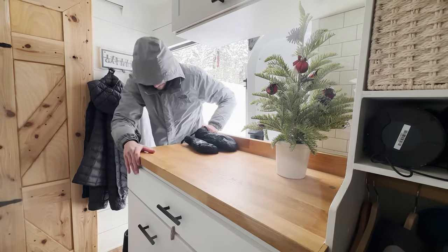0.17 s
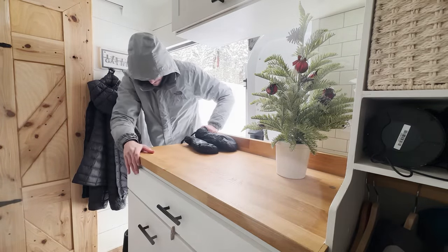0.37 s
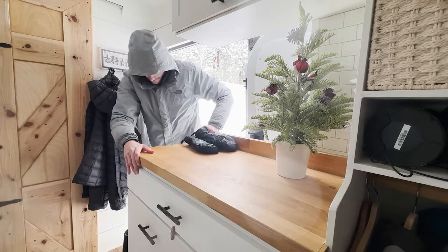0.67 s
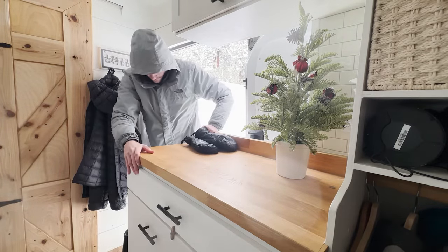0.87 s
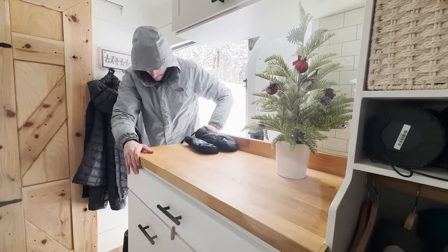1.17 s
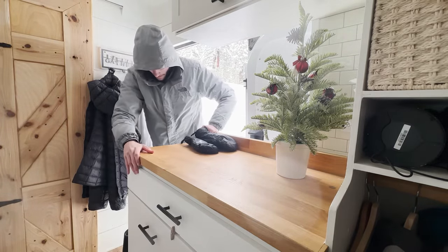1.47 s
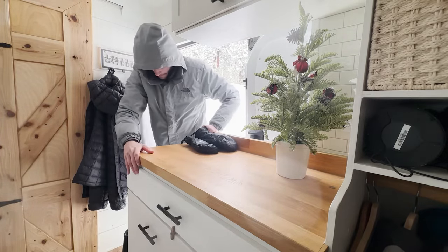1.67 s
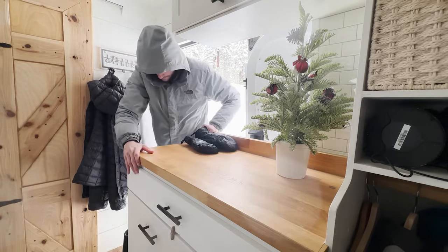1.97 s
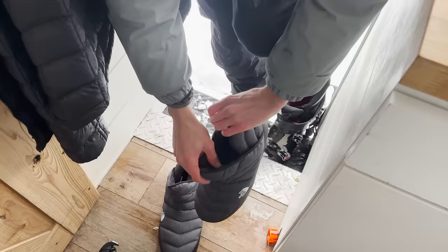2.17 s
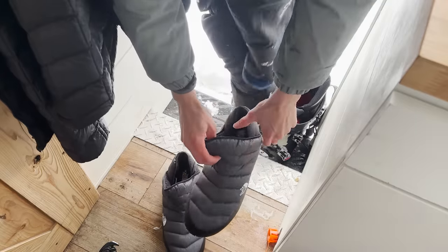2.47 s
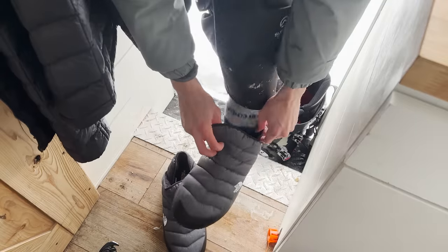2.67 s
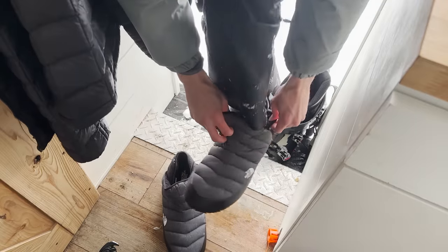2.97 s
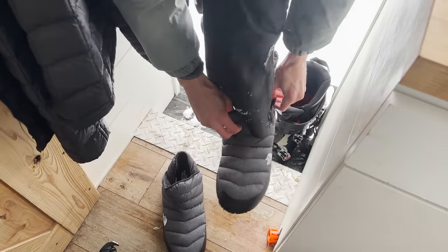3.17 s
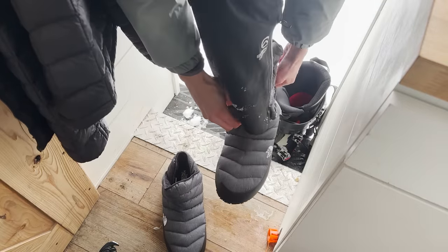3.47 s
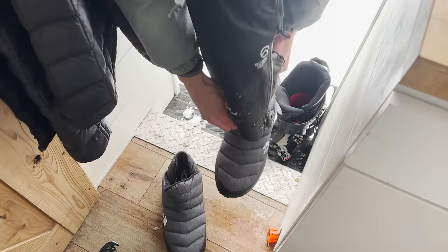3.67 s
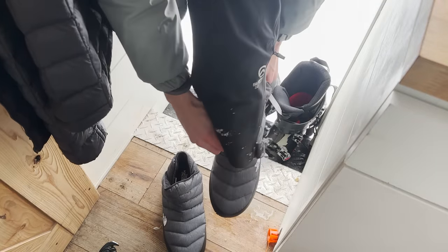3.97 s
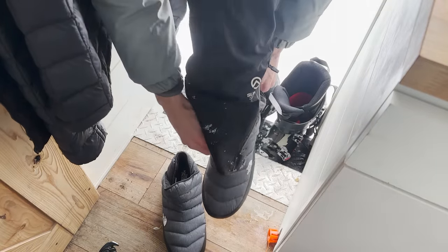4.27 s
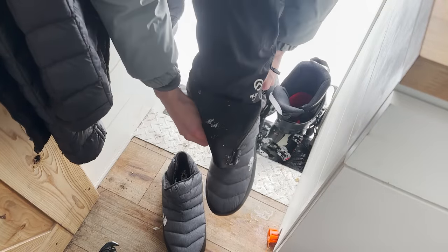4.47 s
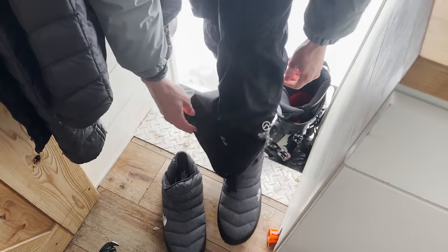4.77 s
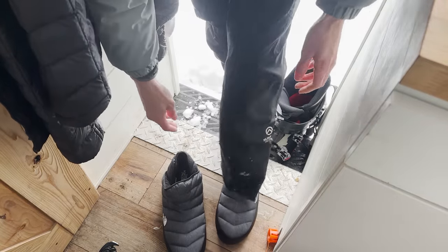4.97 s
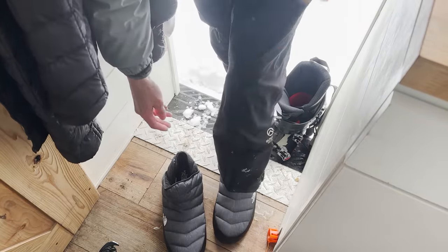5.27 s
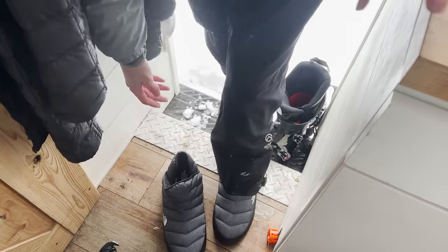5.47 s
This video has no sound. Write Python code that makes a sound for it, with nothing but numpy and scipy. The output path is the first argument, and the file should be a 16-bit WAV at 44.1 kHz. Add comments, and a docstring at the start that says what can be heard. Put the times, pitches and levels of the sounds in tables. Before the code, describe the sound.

Four hard, hollow boot blows ring through floorboards in a tight cabin, followed by close, quiet fabric rustling, small ticks and a faint final foot contact.

```python
"""Stiff boots are kicked off on the step of a small wood-lined van, then a padded slipper is pulled on.
Close up inside, each blow rings decaying board modes and two boot-shell modes under a noise cabin echo.
Nylon clothes rustle as flickering noise bands; buckles and grit tick as short noise bursts.
Low noise rocks the van on its springs and rumbles its panels; faint steady noise is the still air
at the open door. The microphone signal is softly rounded at its peaks and has its top cut."""
import sys
import numpy as np
from scipy import signal
from scipy.io import wavfile
from scipy.ndimage import uniform_filter1d

SR = 44100
rng = np.random.default_rng(int(sys.argv[2]) if len(sys.argv) > 2 else 0)


def output_pcm(signal):
    """Save a mono or channel-first signal as 16-bit PCM at the path in sys.argv[1].

    Samples are clipped to [-1, 1] before scaling.
    """
    pcm = np.clip(np.atleast_2d(signal).T, -1, 1) * 32767
    wavfile.write(sys.argv[1], SR, np.round(pcm).astype(np.int16))


N = 247401


def undb(db):
    """Turn decibels into an amplitude factor."""
    return 10 ** (np.asarray(db) / 20)


def on_log(hz, points_hz, values):
    """Read a spectrum on a log-frequency axis."""
    return np.interp(np.log(hz), np.log(points_hz), values)


def band(hz, octaves, size):
    """Noise of rms 1 around a centre frequency."""
    edges = np.clip([hz * 2 ** (-octaves / 2), hz * 2 ** (octaves / 2)], 1, SR / 2.1)
    bandpass = signal.butter(2, edges, "band", fs=SR, output="sos")
    run_in = SR // 4  # dropped, so that the filter has settled
    x = signal.sosfilt(bandpass, rng.standard_normal(size + run_in))[run_in:]
    return x / x.std()


def walk(rate):
    """Random levels held 1 / rate s and smoothed twice; spread near 1."""
    k = int(SR / rate)
    held = np.repeat(rng.standard_normal(N // k + 1), k)
    slewed = uniform_filter1d(uniform_filter1d(held, k), k)
    return 1.3 * slewed[:N]


def fade(t, t60, rise_s):
    """Rise, then die by 60 dB in t60."""
    return (1 - np.exp(-t / rise_s)) * np.exp(-np.log(1000) * t / t60)


def add(out, s, x):
    """Mix a sound in at a time."""
    i = int(s * SR)
    out[i:i + len(x)] += x[:N - i]


def curve(table):
    """A control at every sample, in straight lines between the points."""
    return np.interp(np.arange(N) / SR, *np.transpose(table))


STEP_DB = 20  # a listed rise or fall time covers this much


def swells_db(rows, peak_db):
    """Summed power, in dB, of swells that rise, hold and fall at steady dB rates."""
    t = np.arange(0, N, 64) / SR
    power = 1e-12
    for (s, rise_s, hold_s, fall_s), db in zip(rows, peak_db):
        # 0 during the hold, 1 at one rise time before it or one fall time after it
        away = np.maximum((s - t) / rise_s, (t - s - hold_s) / fall_s)
        power = power + undb(db - STEP_DB * np.clip(away, 0, None)) ** 2
    return curve(np.transpose([t, 10 * np.log10(power)]))


# still air at the open door: f/Hz, level/dB of each half-octave band
STILL_AIR = [(70, -86), (130, -85.5), (300, -82), (1000, -83.5), (3000, -80.5), (8000, -80.5),
             (15000, -89.5)]
# cabin air resonances: f/Hz, width/octaves, level/dB
HOLLOWS = [(50, .25, -79), (202, 0.2, -78), (358, 0.2, -80), (1072, 0.57, -78)]


def air():
    """A faint even noise hush, with wavering noise bands where the cabin air resonates."""
    out = np.zeros(N)
    for hz in 60 * 2 ** np.arange(0, 8.1, .5):
        out += undb(on_log(hz, *np.transpose(STILL_AIR))) * band(hz, 0.63, N)
    for hz, octaves, db in HOLLOWS:
        waver_db = 1.3 * walk(4.3)
        out += undb(db + waver_db) * band(hz, octaves, N)
    return out


# colour of the nylon rustle: f/Hz, level/dB per Hz, relative to the moves
RUSTLE = [(59, -43), (100, -12.5), (206, -4.5), (308, -6.5), (365, 8), (461, -6.5), (970, -5),
          (2470, -11.5), (8280, -14), (12700, -26.5), (16000, -24)]
# moves of sleeves, trousers and slipper: full level from t/s, rise/s, hold/s, fall/s,
# rustle level/dB, swish level/dB against the rustle, shuffle level/dB
MOVES = [(0.0, .02, 0.021, 0.17, -64, -4, -71), (0.192, 0.16, .05, .06, -54, -5.5, -54.5),
         (0.287, .04, 0.041, 0.18, -62.5, -6.5, -63), (0.439, 0.044, 0.08, 0.14, -64.5, -2.5, -69),
         (0.628, 0.048, .05, .4, -61.5, -6, -64), (0.836, 0.11, .02, .03, -66.5, -11, -64.5),
         (1.13, .1, .04, 0.058, -68.5, -15, -69), (1.231, 0.057, .04, 0.41, -73, 3, -71),
         (1.365, 0.13, .04, 0.048, -66, -4, -67.5), (1.588, 0.12, 0.053, 0.13, -62, -9, -57),
         (1.72, 0.11, 0.02, .11, -70.5, -11, -70), (1.933, 0.017, 0.015, 0.24, -62.5, -6, -66),
         (2.26, .1, 0.058, 0.28, -62, 8.5, -57.5), (2.405, 0.14, .03, 1, -56.5, -2.5, -57.5),
         (2.507, 0.13, 0.027, .3, -60.5, 6, -72.5), (2.66, 0.1, 0.051, 0.21, -63, -1, -70),
         (3, 0.2, 0.04, 0.19, -64.5, 2.5, -70), (3.14, 0.17, 0.042, 0.17, -63, -1, -66),
         (3.329, .15, 0.092, 0.099, -69, 3.5, -68), (3.525, 0.055, 0.13, 0.27, -68.5, 2, -67),
         (3.746, 0.54, 0.023, 0.19, -60.5, -5, -65.5), (3.954, 0.29, 0.13, 0.22, -62.5, -5, -69),
         (4.111, 0.19, 0.04, 0.073, -55, -5.5, -55), (4.293, 0.051, .06, .1, -71, -4.5, -74.5),
         (4.551, 0.094, 0.015, 0.19, -56.5, -4, -58.5), (4.653, 0.18, 0.077, 0.29, -62, 4, -67.5),
         (4.823, .04, 0.016, 0.048, -66.5, -2, -65), (4.92, 0.099, 0.021, 0.12, -62.5, -3, -62),
         (5, .04, .02, 0.11, -64, 1.5, -72), (5.11, 0.25, .02, 0.22, -65, 2.5, -58.5),
         (5.202, 0.16, 0.067, 0.14, -68, 2.5, -65), (5.34, 0.16, .02, 0.22, -65, -1.5, -60.5),
         (5.478, 0.34, 0.094, .1, -63.5, -2, -55.5), (5.572, .03, .04, .1, -60.5, -7, -46.5)]


def cloth():
    """Nylon on nylon: noise bands that flicker, treble opening on quick slides, bass from shuffling feet."""
    *shape, level, swish, shuffle = np.transpose(MOVES)
    rows = np.transpose(shape)
    level_db = swells_db(rows, level)
    swish_db = swells_db(rows, level + swish)
    shuffle_db = swells_db(rows, shuffle)
    rustle_hz, rustle_db = np.transpose(RUSTLE)
    # folds let go in small jerks shared by all bands, and now and then in a sharp crackle
    snaps = (rng.random(N) < 30 / SR) * rng.exponential(0.45, N)  # about 30 per second
    crackle = signal.lfilter([1], [1, -np.exp(-1 / (0.002 * SR))], snaps)  # each dies over 2 ms
    jerks = undb(1.0 * walk(25) + 0.88 * walk(90)) * (1 + 0.35 * crackle)
    out = np.zeros(N)
    for hz in 110 * 2 ** np.arange(0, 7.6, .5):
        # bass follows the shuffle, treble the swish, the middle the rustle
        swish_share = on_log(hz, (1800, 4000), (0, 1))
        shuffle_share = on_log(hz, (400, 800), (1, 0))
        level_share = 1 - shuffle_share - swish_share
        moving_db = shuffle_share * shuffle_db + swish_share * swish_db + level_share * level_db
        width_db = 10 * np.log10(hz / 1000)  # bands widen with frequency
        flicker_db = 1.6 * walk(14)
        db = on_log(hz, rustle_hz, rustle_db) + width_db + moving_db + flicker_db
        out += undb(db) * band(hz, 0.65, N)
    return jerks * out


# rocking on the springs: t/s, level/dB
SWAY = [(0.0, -60), (0.22, -42), (0.48, -59), (0.58, -49.5), (0.67, -60), (0.73, -51), (0.82, -52),
        (1.0, -61), (1.05, -47), (1.34, -64.5), (1.86, -58.5), (2.14, -61), (2.36, -41.5), (2.62, -35),
        (2.76, -47), (2.94, -55), (4.2, -56.5), (4.9, -67), (5.2, -45), (5.41, -59), (5.56, -41.5),
        (5.61, -44)]
# loads that set the panels rumbling: full level from t/s, rise/s, hold/s, fall/s, level/dB
LOADS = [(0.142, 0.053, .01, 0.09, -42.5), (0.3, .1, 0.11, 0.27, -63), (0.677, 0.054, 0.18, 0.16, -42.5),
         (1.045, 0.1, .02, 0.48, -45.5), (1.547, 0.06, .01, 0.13, -46), (1.761, 0.083, .05, 0.8, -64),
         (2.215, 0.13, 0.033, 0.092, -43), (2.4, .1, .02, .1, -54), (2.6, 0.089, 0.018, 0.082, -71),
         (4.91, 0.084, .01, .1, -68.5), (5.11, .1, 0.013, 0.085, -55.5), (5.408, .1, .2, .1, -73)]


def body():
    """The van rocks on its springs below hearing and its panels rumble low with each load."""
    loads = np.array(LOADS)
    rocking = undb(curve(SWAY)) * band(5.8, 1.65, N)
    rumble = undb(swells_db(loads[:, :-1], loads[:, -1])) * band(42, 1.3, N)
    return rocking + rumble


# boot blows: t/s; six colour levels/dB (thud, boom, boards, knock, crack, grit); contact/s; # decay
# stretch/ratio; thud lag/s; boot shell low f/Hz, level/dB, high f/Hz, level/dB; # time/s after which the boards
# and boot shell die away fast
BLOWS = [(0.125, -48, -40, -43.5, -44.5, -44, -52, 0.022, 0.89, 0.0058, 512, -36.5, 1030, -38, .2),
         (0.655, -17.5, -18.5, -23, -18, -21.5, -36.5, 0.0079, 0.94, 0.012, 711, -17, 1241, -13, 0.15),
         (1.01, -20.5, -15.5, -20, -27.5, -31, -36.5, .013, 0.9, 0.0015, 311.8, -15, 692, -31, .13),
         (1.519, -52, -42.5, -27, -32, -43.5, -58.5, 0.0081, 0.85, 0.00033, 461, -27.5, 704, -23.5, 0.056),
         (2.142, -17.5, -12, -18, -18, -23.5, -28, 0.0078, 0.87, 0.0042, 292.3, -16.5, 934, -14, 0.068),
         (5.064, -48.5, -49.5, -50, -60, -51, -70, 0.031, 0.38, 0.00067, 354, -56.5, 1201, -50, 0.034),
         (5.578, -68.5, -43, -48, -45, -52, -64.5, 0.015, 0.36, 0.0054, 535, -38.5, 960, -54, .05)]
# centres of the six colour levels, in the same order: f/Hz
BLOW_BANDS_HZ = (120, 200, 330, 950, 3000, 9500)
# modes of floor, step and cupboards: f/Hz, level/dB against the blow's colour, t60/s before the stretch
BOARDS = [(62, -13.5, 0.09), (94, -4, .25), (126.5, 3.5, 0.24), (167.9, -1.5, 0.18), (192.1, -3.5, 0.24),
          (239.4, 1, .26), (276.4, -1.5, 0.31), (300.7, 2, 0.17), (334.8, -8, 0.39), (396.3, 3, 0.18),
          (436.3, -5, .13), (464.3, -3, 0.18), (505, -4, 0.24), (593, -1, 0.14), (674, -11, .13),
          (716, -4.5, 0.2), (861, -6, 0.089), (895, 3, 0.078), (1073, -1.5, 0.073), (1125, -14.5, .09),
          (1115, 0, 0.12), (1282, -6.5, .07), (1383, -9.5, 0.079), (1649, -5, 0.11), (1640, -20, .14),
          (2195, -10.5, 0.054), (2670, -7.5, .12)]
# cabin echo: f/Hz, level/dB against the blow's colour, t60/s before the stretch
CABIN = [(400, -8, 0.22), (990, -5, 0.16), (2530, -4.5, 0.17), (6000, -3.5, 0.16), (11430, -2.5, 0.14),
         (16300, -24.5, 0.12)]
BOARDS_DB, CABIN_DB = -5, -1.5  # added to every board level and every cabin level
SETTLE_SHARE = 0.17  # part of the contact that sets how slowly the force builds up


def blows():
    """Each blow drives the same board modes while the sole is in contact; the cabin returns a dense tail."""
    out, t = np.zeros(N), np.arange(SR // 2) / SR
    cabin_hz, cabin_db, cabin_t60 = np.transpose(CABIN)
    for s, *colour_db, contact_s, stretch, lag_s, low_hz, low_db, high_hz, high_db, damped_s in BLOWS:
        held = np.clip(t - contact_s, 0, None)  # the ring only dies once the sole has settled
        choke = undb(-250 * np.clip(t - damped_s, 0, None))  # after that time boards and shell die a further 250 dB/s
        force_s = SETTLE_SHARE * contact_s
        for hz, db, t60 in BOARDS:
            detune, phase, place = rng.standard_normal(3)
            rise = 1 - np.exp(-t / (force_s + 0.57 / hz))  # low boards take longer to swing up
            place_db = 1.2 * place  # every blow lands elsewhere
            gain = undb(on_log(hz, BLOW_BANDS_HZ, colour_db) + db + BOARDS_DB + place_db)
            ring = np.sin(2 * np.pi * (hz * (1 + 0.0075 * detune) * t + phase))
            decay = fade(held + 0.0004, t60 * stretch, 1e-4)
            # the weight arrives after the first touch, and only the big boards feel it
            late_s = lag_s * on_log(hz, (150, 500), (1, 0))
            add(out, s + late_s, gain * rise * decay * choke * ring)
        # loose buckles and drawers make the tail a little lumpy
        rattle = undb(.9 * walk(250)[:len(t)])
        for hz in 400 * 2 ** np.arange(0, 5.6, .5):
            echo_db = on_log(hz, cabin_hz, cabin_db) + CABIN_DB
            gain = undb(on_log(hz, BLOW_BANDS_HZ, colour_db) + echo_db)
            rise = 1 - np.exp(-t / (force_s + 0.27 / hz))
            tail = fade(held + 0.00075, on_log(hz, cabin_hz, cabin_t60) * stretch, 1e-4)
            add(out, s, gain * rise * tail * rattle * band(hz, 0.6, len(t)))
        # the hollow boot itself: two quickly damped modes that depend on which boot and face is struck
        for hz, db in ((low_hz, low_db), (high_hz, high_db)):
            shell = np.sin(2 * np.pi * hz * t)
            add(out, s, undb(db) * fade(t, 30 / hz + 0.068, 0.0039) * choke * shell)
    return out


# ticks of buckles, grit and seams: t/s, nominal peak level/dB, centre f/Hz, t60/s, width/octaves
TICKS = [(.280, -43.5, 1790, 0.064, 1.2), (0.438, -41.5, 1250, 0.085, 1.2), (0.631, -51, 1200, 0.11, 0.81),
         (0.847, -58.5, 2350, 0.13, 1.3), (1.227, -50, 1590, 0.33, 1.3), (1.345, -63, 1190, 0.14, 0.54),
         (1.701, -54, 3510, .06, 1.3), (1.745, -54, 2080, 0.29, 0.51), (1.883, -50.5, 2200, 0.064, 2.5),
         (1.935, -40, 4930, 0.11, 2.1), (2.0, -53, 1490, 0.092, 1.8), (2.067, -50, 1500, 0.15, 1.7),
         (2.271, -42.5, 3470, 0.75, 0.83), (2.395, -35, 894, .04, 0.88), (2.445, -34.5, 940, 0.028, 1.1),
         (2.486, -39, 1150, 0.061, 1.6), (2.760, -40, 1500, 0.024, 1.5), (2.771, -46, 6000, 0.027, 0.73),
         (2.829, -35.5, 5370, 0.016, 2.9), (3.33, -47, 1190, 0.056, 1.4), (3.507, -47, 500, 0.11, 1.7),
         (3.6, -47, 1200, 0.034, 1.7), (3.75, -46, 1800, 0.043, 1.3), (4.063, -45, 2500, .05, 1.3),
         (4.49, -51, 2000, 0.046, 2.2), (4.555, -45, 3000, 0.054, 2.9), (4.934, -49.5, 2920, 0.089, 4),
         (5.005, -44.5, 6300, 0.066, 1.7), (5.33, -47, 1990, .05, 1.4), (5.427, -39.5, 1210, 0.023, 1.6),
         (5.461, -40.5, 700, .04, 1.1), (5.480, -38, 500, 0.034, 1.7), (5.503, -46, 1520, .03, 2.8),
         (5.523, -41, 452, .04, 0.68)]
TICK_CREST_DB = 9.5  # nominal peak of a tick over its rms


def ticks():
    """Short contacts: noise bands that start at once and die away, cut off after a quarter second."""
    out, t = np.zeros(N), np.arange(SR // 4) / SR
    for s, db, hz, t60, octaves in TICKS:
        gain = undb(db - TICK_CREST_DB)
        add(out, s, gain * fade(t, t60, 0.00037) * band(hz, octaves, len(t)))
    return out


def scene():
    """All layers on one microphone channel."""
    return (air() + cloth() + body() + blows() + ticks())[None]


TOP_HZ = 15750  # upper edge of the camera's sound


def record(dry):
    """The camera rounds the loudest peaks and cuts the top."""
    rounded = np.tanh(1.5 * dry) / 1.5
    lowpass = signal.ellip(10, .2, 70, TOP_HZ, fs=SR, output="sos")  # .2 dB ripple, 70 dB stopband
    return signal.sosfilt(lowpass, rounded)


dry = scene()
out = record(dry)
output_pcm(out)
```